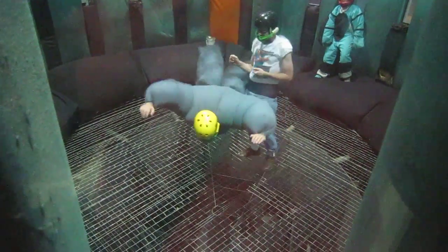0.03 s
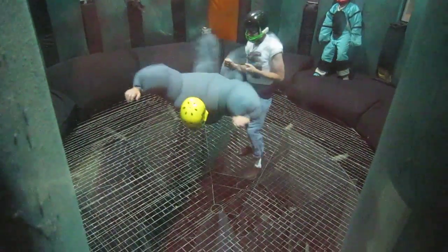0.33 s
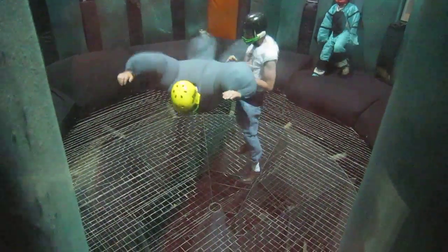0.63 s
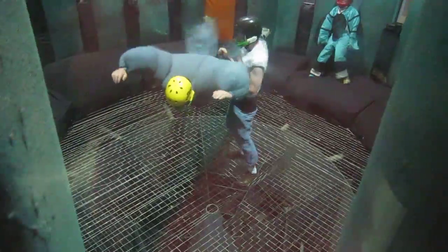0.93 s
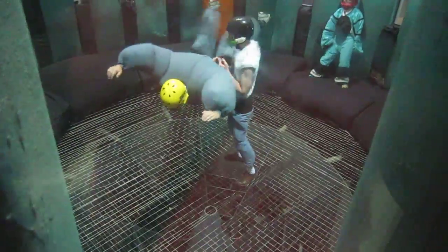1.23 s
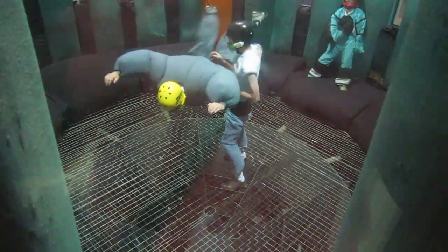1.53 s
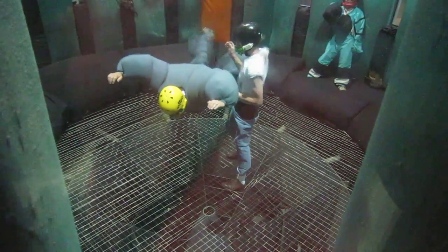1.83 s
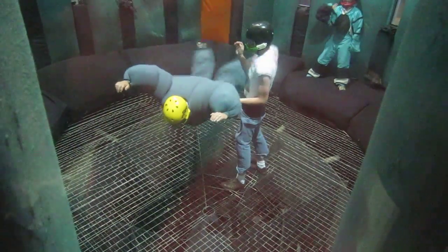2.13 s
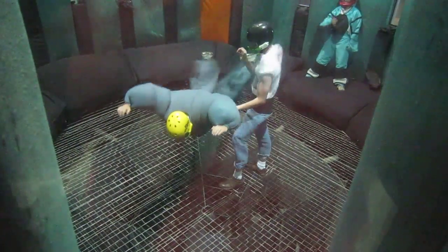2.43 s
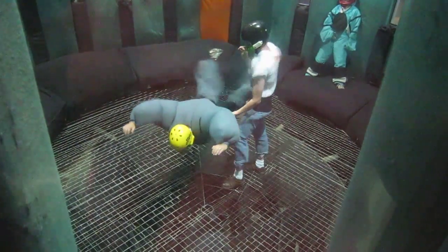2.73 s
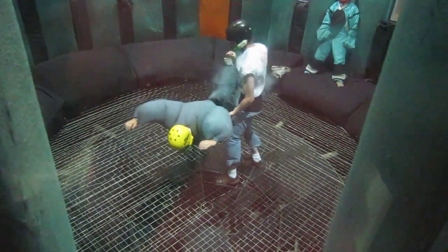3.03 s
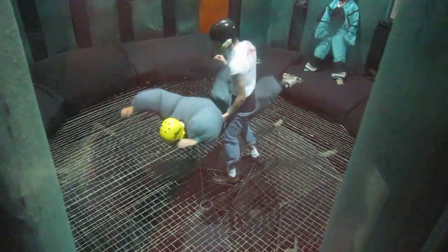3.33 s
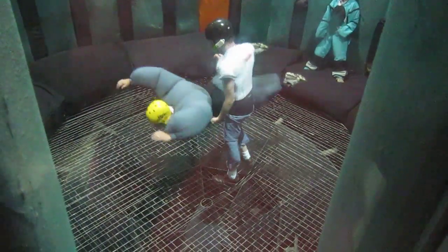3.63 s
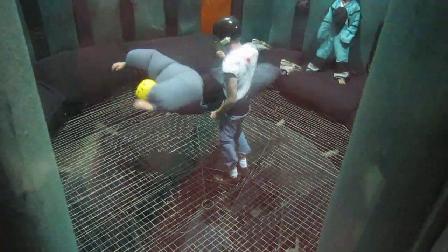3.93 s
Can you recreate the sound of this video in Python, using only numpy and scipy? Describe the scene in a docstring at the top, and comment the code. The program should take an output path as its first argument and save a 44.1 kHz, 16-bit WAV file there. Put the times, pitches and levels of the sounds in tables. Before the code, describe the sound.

Fast air roars without a break inside an indoor wind tunnel, with a deep fan hum and a softer hiss. The sound swells slightly, and clothing faintly ticks a few times. The microphone is in the chamber.

```python
"""Inside a vertical wind tunnel running at constant speed.
The fan drones at the rate its blades pass and at overtones (multiples of that rate), which turbulence
makes waver. The airflow roars, makes the duct ring, and hisses through the floor net and round the flyer.
A few faint ticks poke out. The microphone line cuts a notch in the treble and adds a thin whine."""
import sys
import numpy as np
from scipy import signal
from scipy.fft import rfft, irfft
from scipy.io import wavfile

SR = 44100
rng = np.random.default_rng(int(sys.argv[2]) if len(sys.argv) > 2 else 0)


def materialize(psi):
    """Save the field psi as 16-bit PCM at rate SR to the path in sys.argv[1].

    A 1-D psi becomes a single channel; in a 2-D psi each row is a channel.
    """
    bounded = np.clip(np.atleast_2d(psi).T, -1, 1)
    quanta = np.round(bounded * 32767).astype(np.int16)
    wavfile.write(sys.argv[1], SR, quanta)


N = 176400   # 4 seconds

# small snaps, probably clothing flapping: start_s, peak_db
TICKS = [(1.406, -35), (1.733, -33), (1.792, -28.5), (1.859, -27.5), (2.978, -38)]

# how the hiss is spread from low to high: pitch_hz, relative_db
HISS_SPECTRUM = [(600, -2.5), (1100, 0), (1500, 0), (1900, 0), (2450, -2), (2700, -3.5), (3300, -2.5),
                 (3800, -4.5), (4600, -10.5), (6000, -15.5), (7000, -19.5), (9000, -23.5), (10200, -23),
                 (12500, -32), (15500, -42.5)]
# how the hiss rises and falls: time_s, level_db
HISS_LEVEL = [(0, -48.5), (.45, -48), (.7, -47.2), (1.2, -47), (1.5, -46), (1.65, -48.5), (2.05, -49),
              (2.37, -47), (3.05, -48), (3.2, -49), (3.48, -47.5), (3.95, -49)]
# extra lift for the top of the hiss: time_s, boost_db
TREBLE_BOOST = [(0, 0.5), (.6, 0), (.95, 1.5), (1.3, -0.5), (1.9, 0.5), (2.3, 0), (2.65, 0), (3.1, 0.5),
                (3.5, 0.5), (4, 0.5)]

# how the roar is spread from low to high: pitch_hz, relative_db
ROAR_SPECTRUM = [(15, -15), (35, -13), (60, -10), (80, -15.5), (120, -5), (165, -4.5), (230, 1.5), (340, 0),
                 (440, -4.5), (580, -7.5), (680, -13.5), (780, -20), (930, -21.5), (1100, -35), (1600, -47)]
# the airflow's strength, which swells the roar and part of the fan: time_s, relative_db
FLOW_LEVEL = [(0, -22), (.3, -21.5), (.53, -23), (.8, -20), (1.0, -20), (1.25, -22), (1.42, -19.5),
              (1.6, -20.5), (1.8, -22.5), (1.95, -22), (2.22, -23.3), (2.62, -20.5), (3.15, -21),
              (3.5, -20), (3.62, -22), (3.76, -19.5), (3.97, -24)]
# pitches at which the flow makes the duct ring: pitch_hz, width_hz, relative_db
DUCT_RESONANCES = [(74, 8.9, -52.5), (131.1, 9, -42.5), (145.8, 12, -38.5), (183, 8.6, -32),
                   (210.6, 21, -35.5), (251, 18, -31.5), (304.1, 28, -36), (330.3, 14, -41),
                   (370, 19.3, -36), (886, 86, -51.5), (1252, 80, -60.5), (1783, 200, -58)]
# the duct's deep boom, two close pitches: pitch_hz, width_hz, relative_db
BOOM_RESONANCES = [(95, 4.6, -5), (105.3, 6, -2.5)]
# how the boom comes and goes: time_s, level_db
BOOM_LEVEL = [(0, -31.5), (.25, -43), (.62, -29), (.88, -36.5), (1.12, -30), (1.4, -32.5), (1.75, -38),
              (2.0, -33), (2.35, -37), (2.85, -36.5), (3.3, -34.5), (3.5, -29.5), (3.65, -34), (4, -30)]

# the fan's weaker overtones: multiple_of_blade_rate, relative_db
WEAK_OVERTONES = [(2, -40.5), (3, -37.5), (6, -35.5), (7, -31.3), (8, -33.5), (9, -39), (10, -44),
                  (11, -44), (12, -51.5), (13, -51.5)]
# how the two strongest, at 4 and 5 times the blade rate, swell and fade: time_s, level_db
FOURTH_LEVEL = [(0, -27.5), (.2, -31.5), (.32, -23.5), (.72, -29), (1.0, -32), (1.28, -40), (1.55, -27.5),
                (1.67, -35.5), (1.81, -21), (2.0, -31.5), (2.14, -42), (2.38, -25), (2.69, -24.5),
                (2.899, -25), (3.07, -26), (3.4, -28), (3.55, -27), (3.85, -24), (4, -32)]
FIFTH_LEVEL = [(0, -43), (.28, -25), (.6, -23), (.75, -32.5), (1.33, -34), (1.52, -22.5), (1.88, -23),
               (2.05, -33.5), (2.37, -25.5), (2.499, -37), (2.68, -22.5), (2.86, -36), (3.14, -24),
               (3.3, -33.5), (3.45, -25.5), (3.62, -34), (4, -32)]


def from_db(db):
    """Turn decibels into a number to multiply the sound by."""
    return 10 ** (np.asarray(db) / 20)


def rms_one(x):
    """Scale a signal so that its average strength (rms) is 1."""
    return x / np.sqrt(np.mean(x ** 2) + 1e-20)


def in_time(rows):
    """Join a table's (time_s, value) points with straight lines, one value per sample."""
    return np.interp(np.arange(N) / SR, *np.transpose(rows))


def drift(per_s):
    """A smooth random wobble of size about 1, changing about per_s times a second."""
    step, warm_up = 40, 2000   # one point every 40 samples; the first 2000 points are dropped
    memory = np.exp(-2 * np.pi * per_s * step / SR)
    noise = rng.standard_normal(N // step + warm_up + 2)
    slow = signal.lfilter([1], [1, -2 * memory, memory * memory], noise)[warm_up:]
    return np.interp(np.arange(N) / step, np.arange(len(slow)), rms_one(slow))


def shaped_noise(spectrum):
    """Noise that follows a (pitch_hz, relative_db) table and fades beyond its lowest and highest pitch."""
    hz, db = np.transpose(spectrum)
    bins_hz = np.maximum(np.arange(N // 2 + 1) * SR / N, 1)
    gain = from_db(np.interp(np.log(bins_hz), np.log(hz), db))
    edge_fade = np.minimum(bins_hz / hz[0], 1) ** 2 * np.minimum(hz[-1] / bins_hz, 1) ** 2
    return rms_one(irfft(rfft(rng.standard_normal(N)) * gain * edge_fade, N))


def resonance(hz, width_hz):
    """Noise ringing in a narrow band around one pitch."""
    band = signal.butter(2, [hz - width_hz / 2, hz + width_hz / 2], "band", fs=SR, output="sos")
    return rms_one(signal.sosfilt(band, rng.standard_normal(N + SR))[SR:])


def ticks(low_hz=600, high_hz=1900):
    """Single, dull snaps that just poke out of the hiss."""
    band = signal.butter(2, [low_hz, high_hz], "band", fs=SR, output="sos")
    snap = signal.sosfilt(band, signal.unit_impulse(SR // 100))
    clicks = np.zeros(N)
    for start_s, peak_db in TICKS:
        clicks[int(start_s * SR)] = from_db(peak_db)
    return signal.fftconvolve(clicks, snap / np.abs(snap).max())[:N]


def air_hiss(gain_db=0.5, flicker_db=-0.06, treble_from_hz=7000):
    """Air rushes through the net and over clothing; its top treble swells a little on its own."""
    air = shaped_noise(HISS_SPECTRUM)
    treble = signal.sosfiltfilt(signal.butter(2, treble_from_hz, "high", fs=SR, output="sos"), air)
    air = air + (from_db(in_time(TREBLE_BOOST)) - 1) * treble
    return from_db(in_time(HISS_LEVEL) + gain_db + flicker_db * drift(per_s=31)) * air


def duct_roar(rumble_gain_db=-4, flicker_db=0.5, ring_gain_db=20.5):
    """Swirling air rumbles and makes the duct ring, so both swell together; a deep boom comes and goes."""
    flow_db = in_time(FLOW_LEVEL)
    swell_db = flow_db - flow_db.mean()
    rumble_db = rumble_gain_db + flow_db.mean() + 0.44 * swell_db   # follows only part of each swell
    rumble = from_db(rumble_db + flicker_db * drift(per_s=9.2)) * shaped_noise(ROAR_SPECTRUM)
    ring = sum(from_db(db) * resonance(hz, width_hz) for hz, width_hz, db in DUCT_RESONANCES)
    boom = sum(from_db(db) * resonance(hz, width_hz) for hz, width_hz, db in BOOM_RESONANCES)
    return rumble + from_db(flow_db + ring_gain_db) * ring + from_db(in_time(BOOM_LEVEL)) * boom


def fan_overtone(phase, unsteady):
    """One overtone: a steady part plus a part that wavers in the turbulence."""
    waver = drift(per_s=2.28) + 1j * drift(per_s=2.28)   # complex, so it moves both level and phase
    tone = np.exp(1j * (phase + 2 * np.pi * rng.random()))
    return rms_one(np.real((1 + unsteady * waver) * tone))


def fan_drone(blade_hz=47.46, hum_db=-30.5, hum_waver_db=0.7, weak_gain_db=-1.18, strong_gain_db=-0.5):
    """Passing blades make a firm hum with overtones; the two strongest swell and fade on their own."""
    pitch_hz = blade_hz * (1 + 0.00097 * drift(per_s=0.67))   # the speed wanders very slightly
    phase = 2 * np.pi * np.cumsum(pitch_hz) / SR
    flow_db = in_time(FLOW_LEVEL)
    swell_db = flow_db - flow_db.mean()
    hum = from_db(hum_db + swell_db + hum_waver_db * drift(per_s=2.3)) * rms_one(np.sin(phase))
    weak = sum(from_db(db) * fan_overtone(multiple * phase, unsteady=0.44)
               for multiple, db in WEAK_OVERTONES)
    strong = sum(from_db(strong_gain_db + in_time(level)) * fan_overtone(multiple * phase, unsteady=0.16)
                 for multiple, level in [(4, FOURTH_LEVEL), (5, FIFTH_LEVEL)])
    return hum + from_db(weak_gain_db + swell_db) * weak + strong


def scene():
    """All the sounds, added up at one microphone in the chamber."""
    return (fan_drone() + duct_roar() + air_hiss() + ticks())[None]


def record(dry, notch_hz=7867, notch_width_hz=2000, whine_hz=15734, whine_db=-92.5, cutoff_hz=15800):
    """The microphone line cuts a notch in the treble and adds a thin whine; the very top is cut off."""
    notched = signal.lfilter(*signal.iirnotch(notch_hz, notch_hz / notch_width_hz, fs=SR), dry)
    whine = from_db(whine_db) * rms_one(np.sin(2 * np.pi * whine_hz * np.arange(N) / SR))
    steep_low_pass = signal.ellip(12, 0.1, 80, cutoff_hz, fs=SR, output="sos")
    return signal.sosfilt(steep_low_pass, notched + whine)


dry = scene()
out = record(dry)
materialize(out)
```